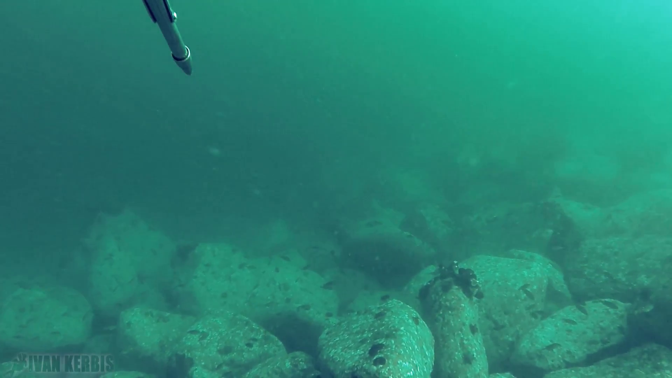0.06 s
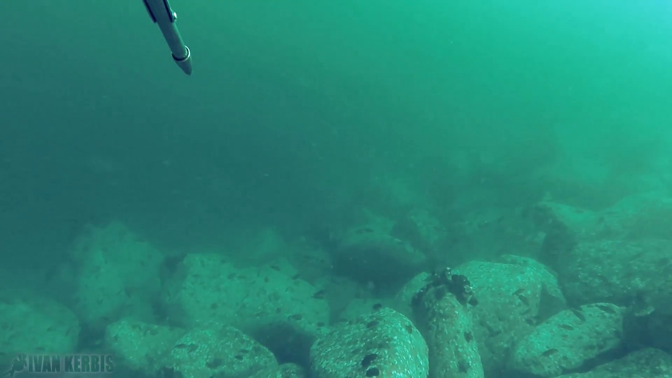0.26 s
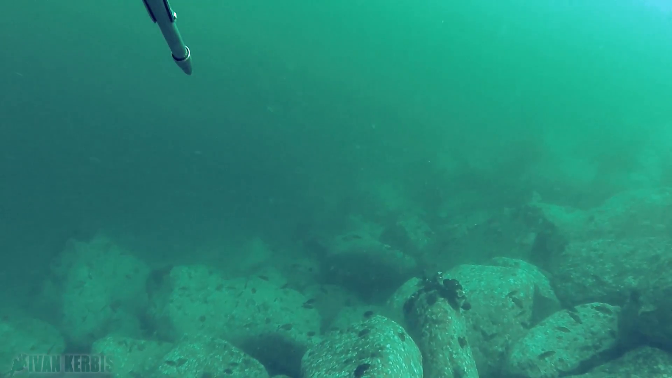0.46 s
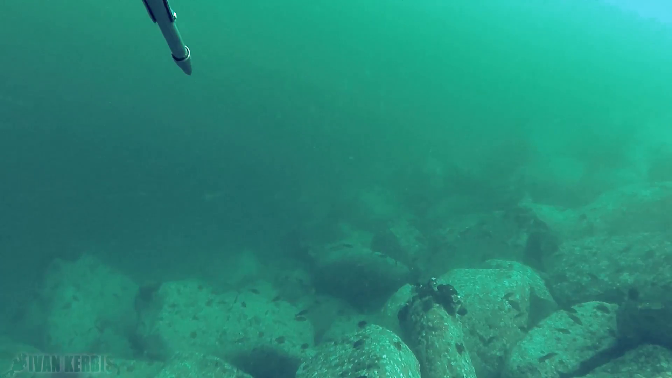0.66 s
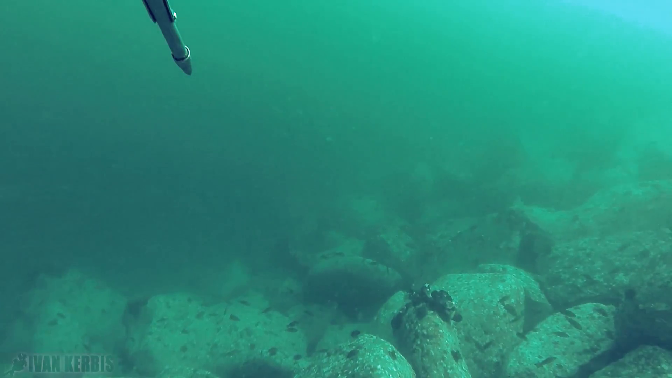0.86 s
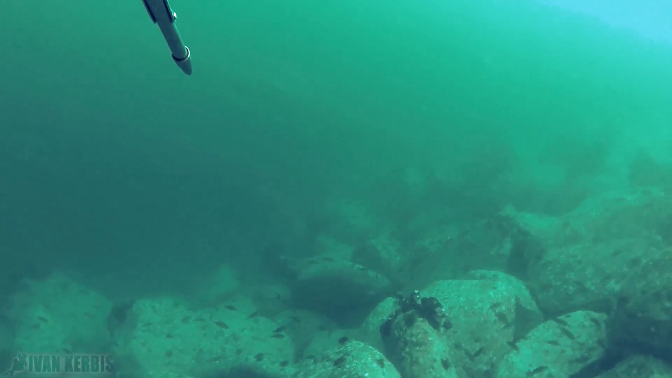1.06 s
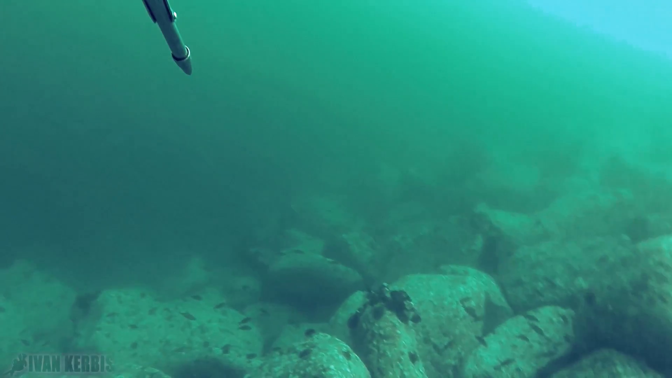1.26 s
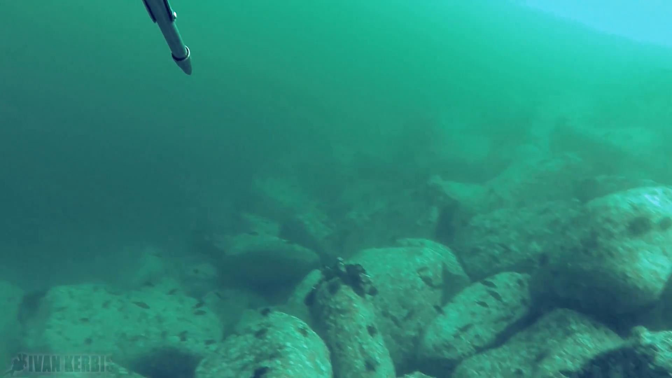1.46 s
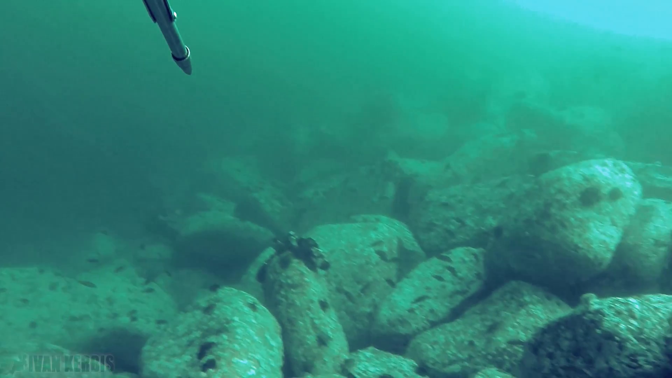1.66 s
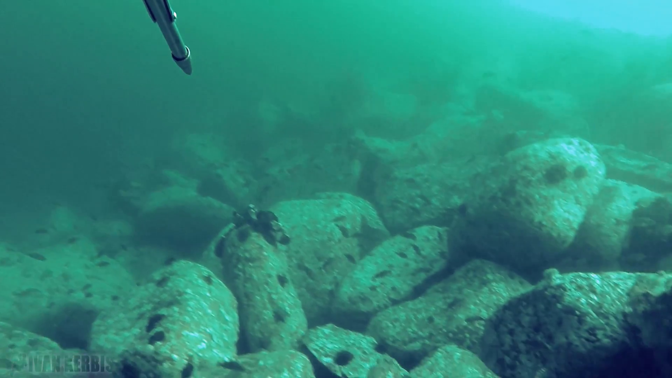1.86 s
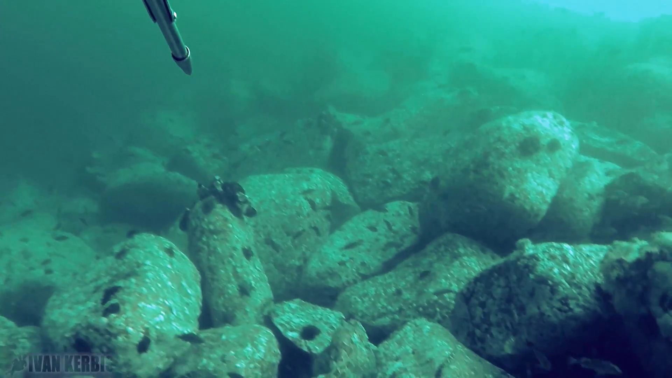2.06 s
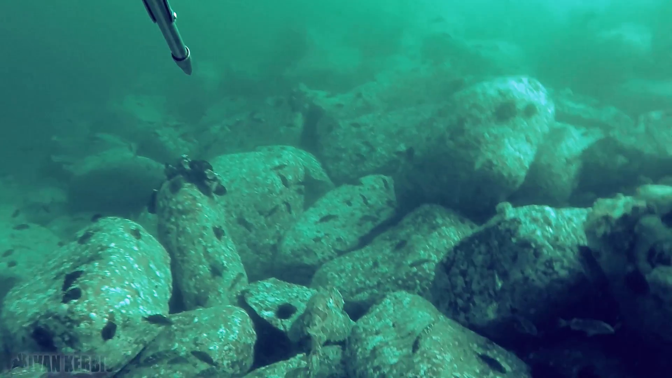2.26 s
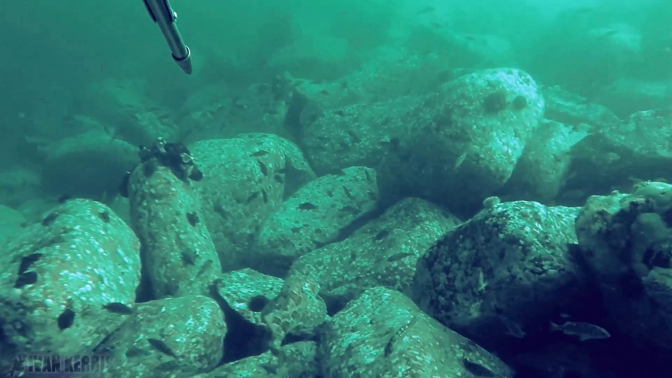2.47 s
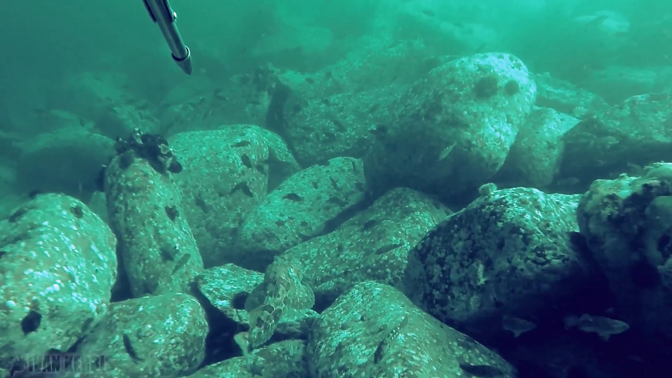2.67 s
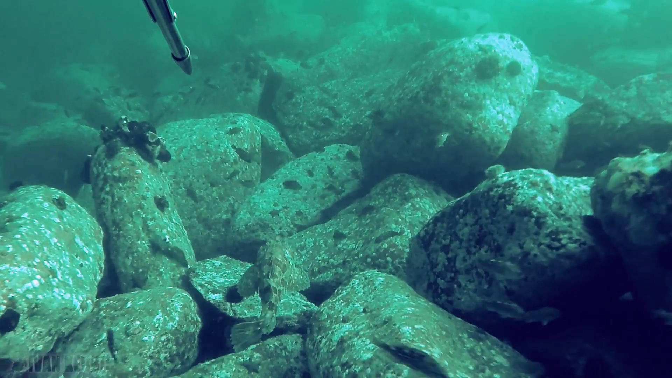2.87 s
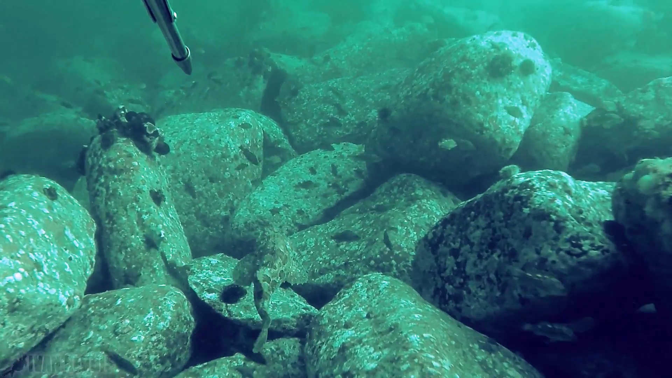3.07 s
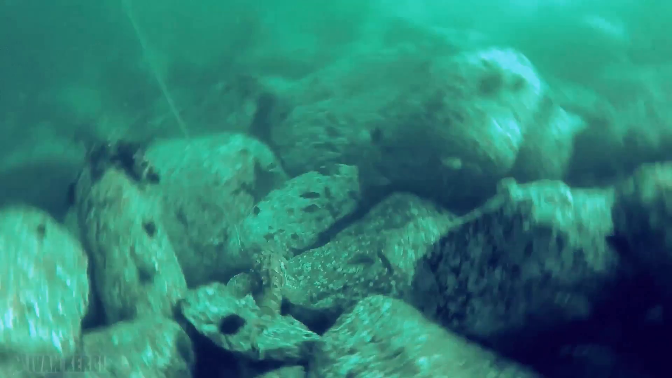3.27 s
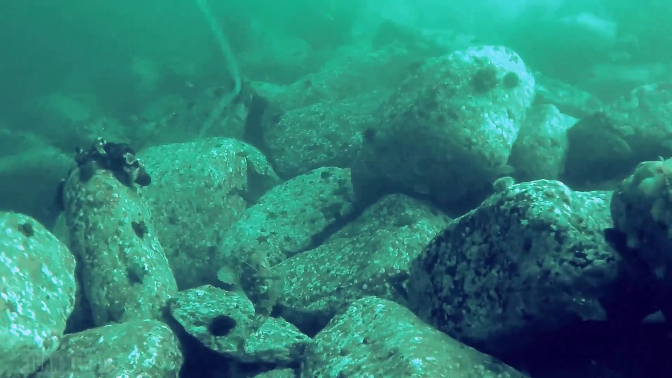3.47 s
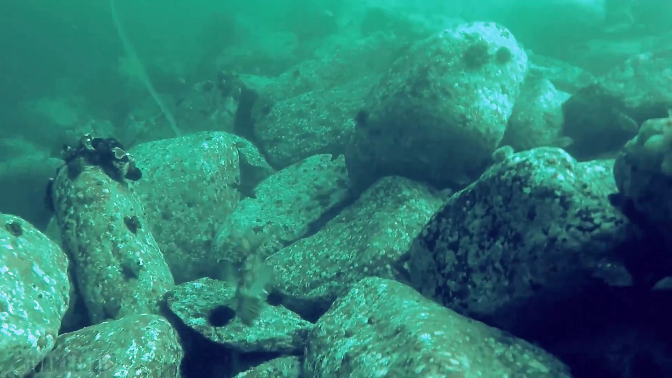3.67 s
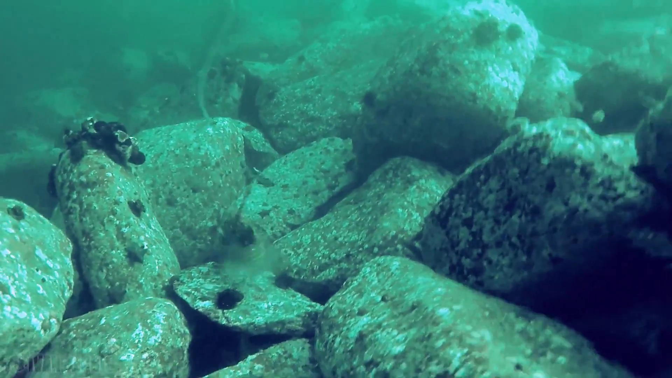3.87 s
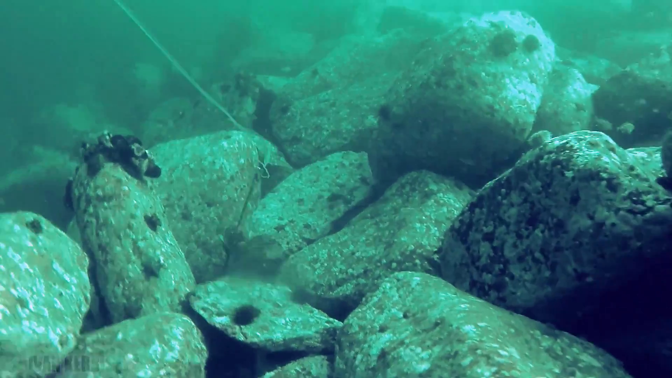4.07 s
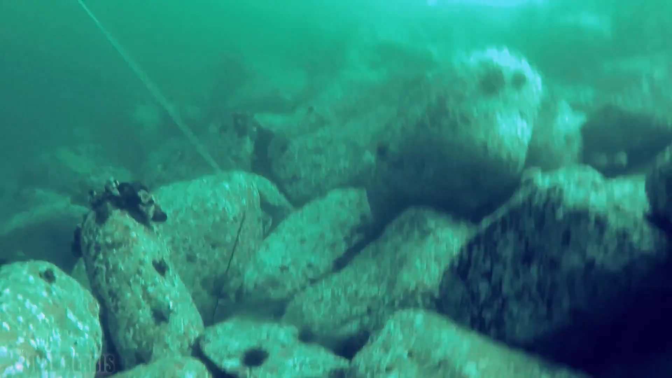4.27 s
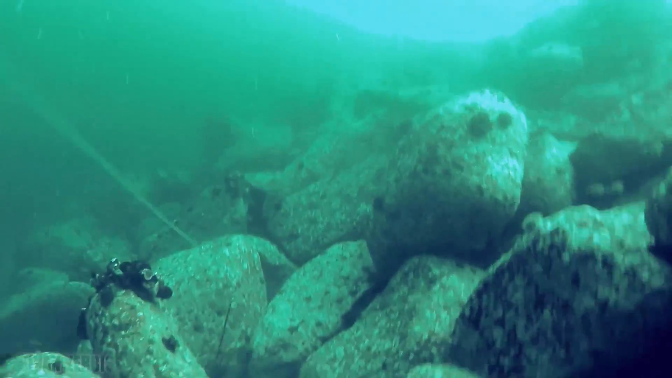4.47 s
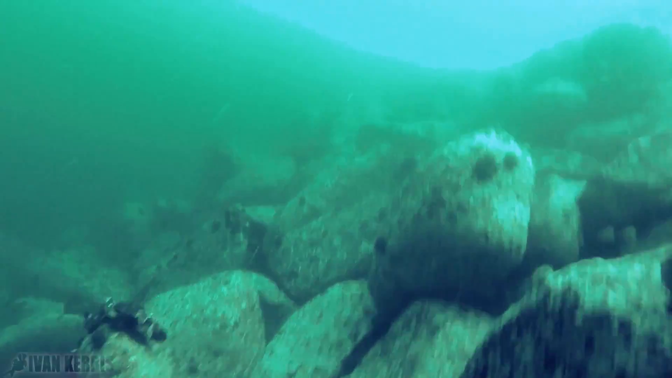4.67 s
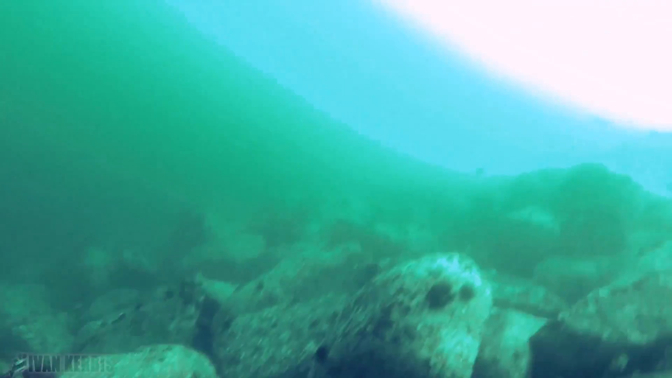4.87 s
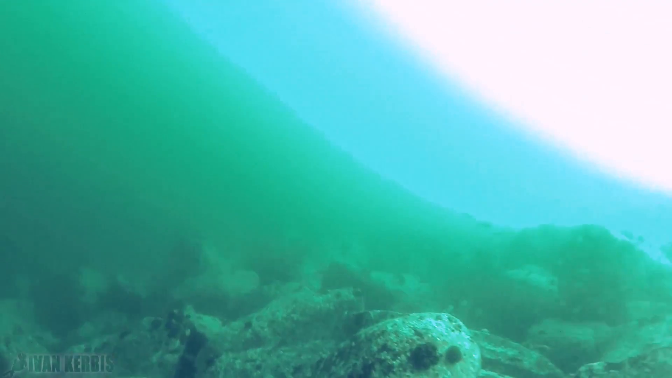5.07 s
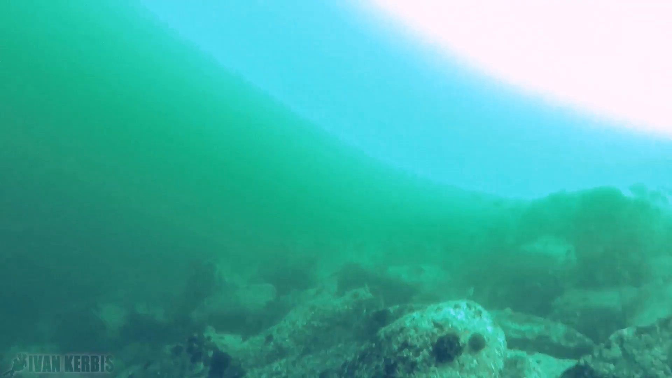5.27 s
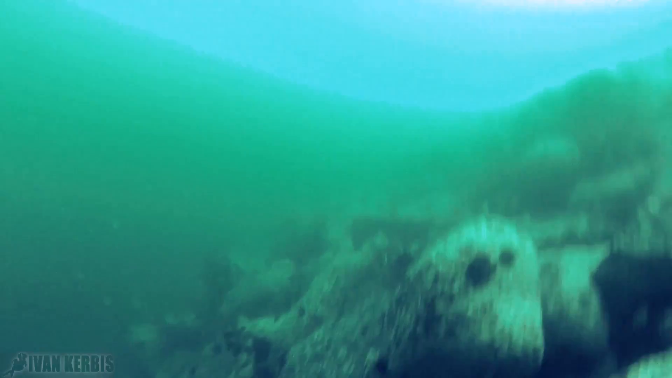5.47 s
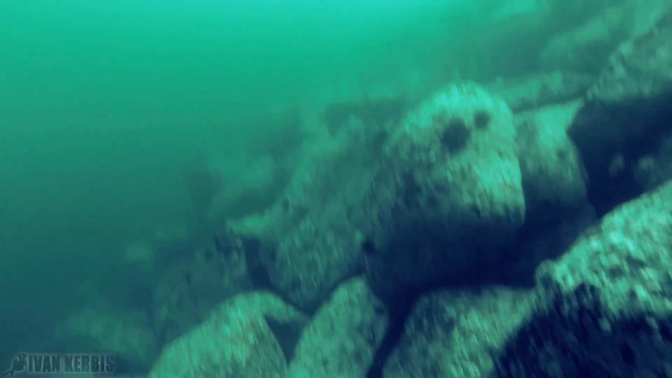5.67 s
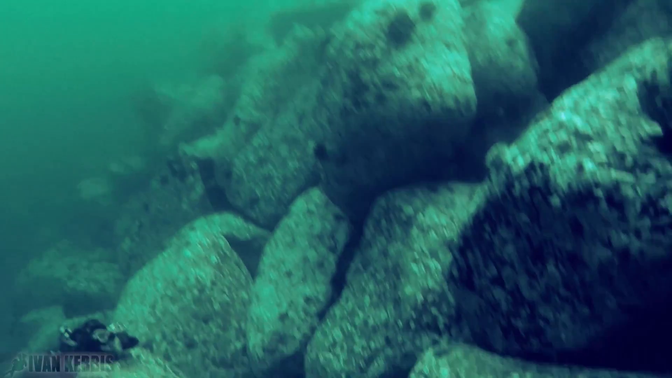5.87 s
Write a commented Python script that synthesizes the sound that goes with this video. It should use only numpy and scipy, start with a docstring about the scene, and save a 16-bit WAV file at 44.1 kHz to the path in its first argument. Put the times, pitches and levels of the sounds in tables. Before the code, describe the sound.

Muffled gear clicks over faint hiss, a sudden loud speargun bang with a short whoosh, then scrapes, heavy knocks and small squeaky rubs underwater.

```python
"""Speargun over a rocky bottom, heard close up by a camera's microphone in a sealed housing on the gun.
Steady hiss with a thin whine lies over low water rumble; rubs and gear knocks then ring the housing modes.
The gun fires with a thump and a rush of line and rubber (swelled friction noise), two whips follow, and
the steel shaft pings lengthwise on the rocks (damped overtones). Handling scrapes, knocks and rumbles
follow, with a few squeaky rubs (narrow ragged noise) near the end."""
import sys
import numpy as np
from scipy import signal
from scipy.fft import rfft, irfft
from scipy.io import wavfile
from scipy.ndimage import uniform_filter1d

SR = 44100
rng = np.random.default_rng(int(sys.argv[2]) if len(sys.argv) > 2 else 0)


def store_pcm(level_fs):
    """Save levels as 16-bit WAV."""
    pcm = np.round(np.clip(level_fs, -1, 1) * 32767).astype(np.int16)
    wavfile.write(sys.argv[1], SR, np.atleast_2d(pcm).T)


N = 261513

# Housing modes, close to the microphone: (frequency [Hz], level [dB], t60 [s])
# hollow body
BODY_MODES = [(385, -6.5, 0.06), (501, -4, 0.056), (690, -2, 0.051), (901, 1.5, 0.019), (1255, -2, 0.034)]
# wall tick
TICK_MODES = [(1550, -11.5, 0.027), (1977, -4, 0.017), (2187, -5.5, 0.01), (2650, -10, 0.0055),
              (3122, -4.5, 0.011), (3277, 0, 0.013), (3576, -1, 0.011)]
# hard crack
CRACK_MODES = [(4700, -1, 0.005), (4900, -8.5, 0.012), (6140, -12, 0.0095), (6584, -13, 0.01)]
# thin treble
TREBLE_MODES = [(7600, -11, 0.003), (9500, -0.5, 0.003), (11200, -15, 0.0074), (11980, -5.5, 0.0072),
                (13400, -10.5, 0.0049)]


def undb(db):
    """Amplitude ratio of a level in dB."""
    return 10 ** (np.asarray(db) / 20)


def unit(x):
    """Scale to rms 1."""
    return x / np.sqrt(np.mean(x ** 2))


def bandpass(x, order, lo_hz, hi_hz):
    """Butterworth bandpass."""
    return signal.sosfilt(signal.butter(order, [lo_hz, hi_hz], "bandpass", fs=SR, output="sos"), x)


def band(lo_hz, hi_hz):
    """Band of noise with rms 1."""
    return unit(bandpass(rng.standard_normal(N), 2, lo_hz, hi_hz))


def walk(rate):
    """Random levels held 1 / rate s and slewed; spread near 1."""
    k = int(SR / rate)
    steps = np.repeat(rng.standard_normal(N // k + 1), k)
    return 1.78 * uniform_filter1d(steps, k)[:N]


def swell(s, hold_s, rise_db_s, fall_db_s):
    """Gain that rises to 1 at s, holds, then falls, evenly in dB between -80 and 0."""
    end_s = s + max(hold_s, 0)
    corners_s = [s - 80 / rise_db_s, s, end_s, end_s + 80 / fall_db_s]
    i = np.arange(int(corners_s[0] * SR), min(int(corners_s[-1] * SR), N))
    gain = np.zeros(N)
    gain[i] = undb(np.interp(i / SR, corners_s, [-80, 0, 0, -80]))
    return gain


def spells(rows, rise_db_s, fall_db_s, sounds):
    """Each row (time, hold, first sound's dB, dB of the others over the first) swells a blend of the sounds."""
    rows = np.array(rows)
    gains = np.array([swell(s, hold_s, rise_db_s, fall_db_s) for s, hold_s in rows[:, :2]])
    blend = undb(rows[:, 2:3] + np.c_[np.zeros(len(rows)), rows[:, 3:]])
    return np.sum(blend.T @ gains * sounds, axis=0)


def ring(x, hz, t60):
    """A damped mode: a unit impulse starts a sine of amplitude 1."""
    pole = np.exp(2j * np.pi * hz / SR - np.log(1000) / (max(t60, .001) * SR))
    return signal.lfilter([1], [1, -pole], x).imag


def housing(force, modes):
    """Each force rings its own mode; contact takes time, so little reaches beyond the range of the modes."""
    rung = np.zeros(N)
    for k, (hz, db, t60) in enumerate(modes):
        rung += (-1) ** k * undb(db) * ring(force[k], hz, t60)  # neighbours move in opposite senses
    return bandpass(rung, 3, 0.41 * modes[0][0], min(0.86 * modes[-1][0], 16000))


def blows(s, size):
    """Impulses of the given sizes at the given times."""
    x = np.full(N, 1e-18)  # inaudible bed
    np.add.at(x, np.round(np.asarray(s) * SR).astype(int), size)
    return x


def hiss(level_db=-61.5):
    """Microphone hiss: coloured steady noise with a faint high whine."""
    # spectrum of the hiss: (frequency [Hz], density [dB per Hz, relative])
    colour = [(250, -1.5), (740, -8), (1470, -13), (4000, -19.5), (10600, -31), (13800, -33.5),
              (15000, -33.5)]
    # thin steady tone: (frequency [Hz], rms level [dB])
    tone = (13905, -86)
    hz, db = np.transpose(colour)
    f = np.maximum(np.fft.rfftfreq(N, 1 / SR), 1)
    shape = undb(np.interp(np.log(f), np.log(hz), db)) * (f > 250)
    noise = irfft(rfft(rng.standard_normal(N)) * shape, N)
    whine_hz, whine_db = tone
    whine = np.sqrt(2) * undb(whine_db) * np.sin(2 * np.pi * whine_hz * np.arange(N) / SR)
    return dip() * (undb(level_db) * unit(noise) + whine)


def dip(recover_db_s=17.5):
    """Gain of hiss and whine: at set times after loud bangs it drops, holds, then slowly recovers."""
    # drops of the steady background: (time [s], depth [dB], hold [s])
    drops = [(3.221, -10, 0.39), (4.967, -3, 0.15)]
    t = np.arange(N) / SR
    gain_db = np.zeros(N)
    for s, db, hold_s in drops:
        recovered_db = recover_db_s * np.maximum(t - s - hold_s, 0)
        gain_db += (t > s) * np.minimum(db + recovered_db, 0)
    return undb(gain_db)


def rumble(low_db=-61.5, low_per_db=1.36, floor_db=-64.5):
    """Water shoving the housing: deep noise, and a range above that follows more steeply over a steady floor."""
    # course of the deep range: (time [s], level [dB])
    shoves = [(0, -59), (.97, -58), (1.09, -52.5), (1.4, -55.5), (1.7, -48), (2.05, -56.5), (2.48, -44),
              (3.19, -53.5), (3.22, -21.5), (3.38, -44.5), (3.6, -67), (3.88, -64), (4.15, -45), (4.6, -42),
              (4.8, -33.5), (5.0, -47.5), (5.28, -45), (5.45, -30), (5.62, -44), (5.93, -52.5)]
    s, db = np.transpose(shoves)
    deep_db = np.interp(np.arange(N) / SR, s, db)
    # low_db applies, ahead of the floor, where the deep range is at -50 dB
    low = np.hypot(undb(low_db + low_per_db * (deep_db + 50)), undb(floor_db))
    return undb(deep_db) * band(10, 65) + low * band(110, 210)


def rubbing(per_s=2500, spread_db=4.5, broad_db=-2.0, patchy_db=2.5, catch_per_s=45, rush_catch_db=-10.5):
    """Hands, gear, line and rubber: dense uneven slips ring the housing modes under a broader scratch.
    The grip comes and goes, and now and then it catches with a small tick in the walls."""
    # hands and gear on the housing: (time [s], hold [s], tick level [dB],
    # body minus tick [dB], crack minus tick [dB], catches minus tick [dB])
    rub_rows = [(1.08, 0.19, -75, 10, -30, 8.5), (1.44, 0.09, -67, 1.5, -32, 13),
                (1.575, 0.018, -57, -6, -29, -6), (1.62, .3, -69, 5.5, -35, 8.5),
                (1.675, 0.018, -65, 9, -29, -10), (3.449, 0.14, -77.5, 9, -19, 0.5),
                (3.727, 0.33, -67.5, 1.5, -22, -7), (4.1, 0.21, -58.5, -1.5, -16, -6),
                (4.31, 0.028, -49.5, 0, -17, -6), (4.395, 0.082, -47.5, 4.5, -10, -4),
                (4.52, 0.027, -62, 13, -9, -3), (4.615, .2, -48.5, 6.5, -22, -9),
                (4.831, 0.12, -57.5, 18, -27, -6), (5.165, .15, -62.5, 10.5, -25, -7),
                (5.335, 0.16, -48, 5, -21, -5), (5.577, .3, -64, 7.5, -13, -2.5)]
    # trigger pull, line and rubber rushing out, and the two whips after it: (time [s], hold [s],
    # tick level [dB] before catches, body minus tick [dB], crack minus tick [dB], treble minus tick [dB])
    rush_rows = [(3.176, .024, -50.5, 13, -24.5, -34), (3.204, .004, -22, 5, -12, -20),
                 (3.215, .055, -26, 1.5, -36, -20.5), (3.329, .015, -36, -3, -12, -10.5),
                 (3.381, 0.0036, -45, 10.5, -10, -24)]
    groups, grip = [], undb(patchy_db * walk(90))
    for modes in (TICK_MODES, BODY_MODES, CRACK_MODES, TREBLE_MODES):
        hits = rng.random(N) < per_s / SR
        uneven = undb(spread_db * rng.standard_normal(N))
        slips = grip * hits * uneven * rng.choice([-1, 1], N)
        rung = unit(housing([slips] * len(modes), modes))
        scratch = unit(bandpass(slips, 3, 0.71 * modes[0][0], 0.9 * modes[-1][0]))
        groups.append(unit(rung + undb(broad_db) * scratch))
    tick, body, crack, treble = groups
    snags = (rng.random(N) < catch_per_s / SR) * rng.random(N)
    catches = unit(housing([snags] * len(TICK_MODES), TICK_MODES))
    rubs = spells(rub_rows, 500.5, 499.5, [tick, body, crack, catches])
    rush_tick = tick + undb(rush_catch_db) * catches
    rush = spells(rush_rows, 5000, 499, [rush_tick, body, crack, treble])
    return rubs + rush


def knocks(scatter_db=4, reach=0.054, spill=0.32, body_db=1, tick_db=-3, crack_db=1, treble_db=-12,
           slip_s=.0004, bounce_s=0.015, bounce_db=-11, bright_db=5, dull_per_body_db=1.09):
    """Each blow lands elsewhere, so it shares its force differently among the housing modes,
    and small chatter surrounds it."""
    # knocks on the housing, levels ahead of the shift of each range: (time [s], tick level [dB],
    # body minus tick [dB], body centre [Hz], crack minus tick [dB], which sets the treble too)
    knock_rows = [(1.3916, -29.5, -1.5, 1150, -29), (1.4544, -40, 2, 750, -27),
                  (1.4734, -45, -10, 700, -27), (1.4893, -19, 6.5, 664, -18.5), (1.51, -27, -7, 780, -25),
                  (1.5808, -25.5, 3, 756, -31), (1.5859, -18.5, 13, 746, -41), (1.5947, -22.5, 7, 684, -30),
                  (1.6898, -17, 12, 754, -31), (1.7393, -33.5, -3.5, 710, -26), (1.813, -13, 2, 720, -20),
                  (1.8298, -31, 5, 690, -33), (1.8545, -20.5, 3.5, 728, -32), (1.9814, -17, -5.5, 723, -36),
                  (2.005, -33, 3.5, 814, -31), (2.4503, -15, -6.5, 770, -20),
                  (3.2114, -5.5, 9.5, 1280, -25.5), (3.232, -6.5, -3.5, 980, -15),
                  (3.2626, -15, -5, 910, -25), (3.291, -32, 2, 600, -24), (3.3068, -28, -2.5, 500, -18),
                  (3.3362, -20, -7, 650, -1.5), (3.3852, -26, 3, 480, -0.5), (3.7248, -32, -18, 983, -24),
                  (4.128, -42.5, 4, 1171, -0.5), (4.2477, -26.5, -14.5, 654, -28),
                  (4.3022, -10, -2, 645, -2), (4.336, -24, 3.5, 780, -30), (4.4006, -29, 4, 680, -1.5),
                  (4.4165, -39, -9, 580, -7), (4.428, -27, -21, 920, -4), (4.4513, -29, -9, 960, -13.5),
                  (4.4693, -18, -9, 690, -14), (4.485, -24, -14, 674, -12), (4.5038, -21, -1, 800, -20),
                  (4.5345, -39, 6, 530, 6), (4.5898, -38, 14, 650, -25), (4.735, -28, 7.5, 462, -32),
                  (4.7792, -18, -21, 690, 1.5), (4.7825, -5.5, -6, 653, -11.5),
                  (4.7908, -11, -13.5, 920, -15.5), (4.7938, 0.5, -4, 905, -5.5),
                  (4.7974, -0.5, -30.5, 940, -2.5), (4.7994, -13, 1.5, 660, 1.5),
                  (4.8392, -41, 32.5, 523, -24), (4.8472, -29.5, 13, 580, -40),
                  (4.8895, -28.5, 17.5, 784, -32), (4.9133, -25.5, 13, 936, -43),
                  (4.9578, -16, 16.5, 854, -33.5), (4.9619, -13.5, 18, 928, -21),
                  (4.987, -38, -15.5, 704, -25.5), (5.1146, -35, -9, 930, -27.5),
                  (5.146, -31.5, 1, 644, -33), (5.1777, -28.5, -21, 550, -24), (5.206, -37.5, -1, 870, -31),
                  (5.2286, -33, -3, 680, -32), (5.2524, -28.5, -4, 550, -20), (5.2723, -30.5, 0, 720, -25),
                  (5.3482, -20.5, -7, 860, -26), (5.3783, -34, -17, 1000, -4), (5.4064, -41, -3, 990, -0.5),
                  (5.4352, -34.5, 17, 510, -34), (5.5049, -9.5, -18.5, 613, -3),
                  (5.5285, -33, -1, 630, -10), (5.6216, -50, -11, 451, 0), (5.742, -40, -7, 620, -24)]
    s, db, body, centre_hz, crack = np.transpose(knock_rows)
    # upper over lower wall modes: the more body in a blow, the duller its tick
    bright = (bright_db - dull_per_body_db * body)[:, None]
    bounce = rng.random((len(s), 4)).T  # two times, then two sizes
    out = np.zeros(N)
    ranges = ((BODY_MODES, body + body_db), (TICK_MODES, tick_db),
              (CRACK_MODES, crack + crack_db), (TREBLE_MODES, crack + treble_db))
    for modes, level in ranges:
        hz, mode_db = np.array(modes)[:, 0], np.array(modes)[:, 1]
        scatter = scatter_db * rng.standard_normal((len(s), len(modes)))
        size = undb((db + level)[:, None] + scatter)
        late = rng.random(size.shape) * slip_s  # modes outside the body do not all start at once
        if modes is BODY_MODES:  # the struck spot favours the hollow modes near its own pitch
            nearness = np.exp(-.5 * (np.log(hz / centre_hz[:, None]) / reach) ** 2)
            share = nearness + spill * undb(mode_db)
            size = size * share / share.sum(axis=1, keepdims=True)
            late = 0 * late
        if modes is TICK_MODES:  # a bright blow loses the lower wall modes, a dull one the upper
            upper_db, lower_db = np.minimum(bright, 0), np.minimum(-bright, 0)
            size = size * undb(np.where(hz > 2400, upper_db, lower_db))
        force = [blows(s + late[:, k], size[:, k]) for k in range(len(modes))]
        if modes is TICK_MODES:  # two weaker ticks, each shortly before or after the blow
            for j in range(2):
                shift_s = bounce_s * (bounce[j] - .3)
                weaker = undb(bounce_db) * bounce[2 + j]
                for k in range(len(modes)):
                    force[k] = force[k] + blows(s + late[:, k] + shift_s, size[:, k] * weaker)
        out += housing(force, modes)
    return out


def thumps(push_cycles=0.03):
    """Soft pushes of the whole rig: a damped swing that starts inward and sets in over part of a cycle."""
    # dull thumps: (time [s], level [dB], frequency [Hz], t60 [s])
    pushes = [(2.457, -23, 120, 0.039), (2.481, -27, 104.4, 0.12), (3.2025, 8, 183, 0.015),
              (3.216, -10.5, 85.4, 0.25), (3.245, -3, 51.3, 0.032), (3.285, -20, 145.4, 0.17),
              (3.511, -33.5, 119.4, 0.098), (4.128, -24.5, 61.5, 0.05), (4.537, -23, 104, 0.068),
              (4.722, -17.5, 55, 0.072), (4.826, -15.5, 201, 0.069), (4.835, -16, 95, 0.079),
              (4.844, -12, 93, 0.31), (4.962, -0.5, 490, 0.0097), (5.34, -22, 101, 0.25),
              (5.379, -20, 39, 0.22), (5.445, 0, 97, 0.012), (5.481, -15.5, 60.7, 0.088)]
    out = np.zeros(N)
    for s, db, hz, t60 in pushes:
        t = np.arange(int(t60 * SR)) / SR
        fade = 1000 ** (-t / t60) * (1 - np.exp(-t * hz / push_cycles))
        i = int(s * SR)
        out[i:i + len(t)] -= undb(db) * np.sin(2 * np.pi * hz * t) * fade
    return out


def shaft(rise_s=0.00067, high_loss=0.21):
    """A long steel rod struck end-on rings near whole multiples of its lowest note; what touches it damps it."""
    # lengthwise modes of the steel shaft: (frequency [Hz], level [dB])
    shaft_modes = [(1970, 3), (3946, -1), (5932, -23), (7903, -19), (9862, -30.5), (11810, -41)]
    # blows on the shaft: (time [s], level [dB], overtone lift [dB per mode],
    # even modes [dB], t60 of the lowest mode [s])
    pings = [(3.340, -26.5, 1.8, -10, 0.13), (3.386, -31.5, 0.94, -5.5, .2),
             (4.147, -42.5, -0.5, -1.5, .12), (4.183, -37, -0.057, -26, 0.19), (5.070, -58.5, -1, -3, 0.14)]
    out, t = np.zeros(N), np.arange(int(.3 * SR)) / SR
    for s, db, tilt_db, even_db, t60 in pings:
        i = int(s * SR)
        for k, (hz, mode_db) in enumerate(shaft_modes):
            size = undb(db + mode_db + tilt_db * k + even_db * (k % 2))
            decay = 1000 ** (-t * (1 + high_loss * k) / max(t60, .01))  # higher modes die sooner
            fade = decay * (1 - np.exp(-t / rise_s))
            out[i:i + len(t)] += size * fade * np.sin(2 * np.pi * (hz * t + rng.random()))
    return out


def squeak(width_hz=500, patchy_db=5, rise_db_s=500, fall_db_s=600):
    """Squeaky rubs: narrow, ragged bands of friction noise."""
    # squeaks: (time [s], hold [s], level [dB] ahead of the raggedness, centre [Hz])
    squeaks = [(5.327, 0.16, -55, 1956), (5.57, 0.018, -61, 1820), (5.638, 0.096, -60.5, 1836)]
    t = np.arange(N) / SR
    rough = undb(patchy_db * walk(70)) * (walk(width_hz) + 1j * walk(width_hz))
    out = np.zeros(N)
    for s, hold_s, db, hz in squeaks:
        friction = (rough * np.exp(2j * np.pi * hz * t)).real
        out += undb(db) * swell(s, hold_s, rise_db_s, fall_db_s) * friction
    return out


def scene():
    """All sources summed at the one microphone."""
    return (hiss() + rumble() + rubbing() + knocks() + thumps() + shaft() + squeak())[None]


def record(dry, top_hz=15300):
    """Peaks beyond full scale clip; then a steep lowpass cuts the top."""
    lowpass = signal.ellip(8, .2, 70, top_hz, fs=SR, output="sos")
    return signal.sosfilt(lowpass, np.clip(dry, -1, 1))


dry = scene()
out = record(dry)
store_pcm(out)
```